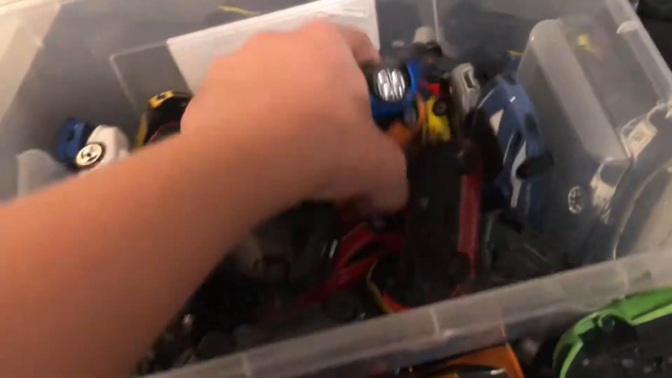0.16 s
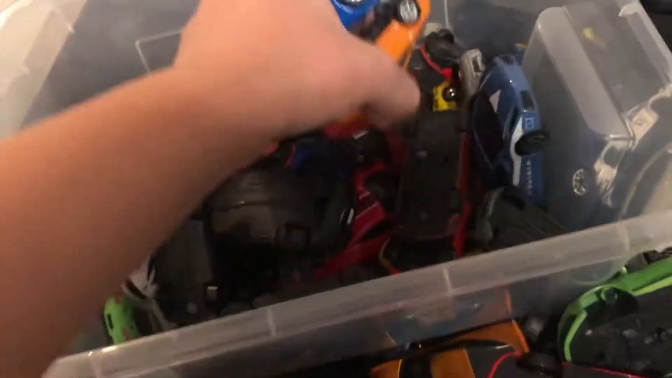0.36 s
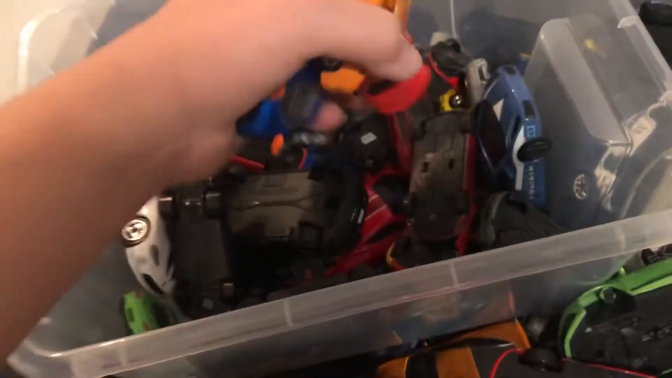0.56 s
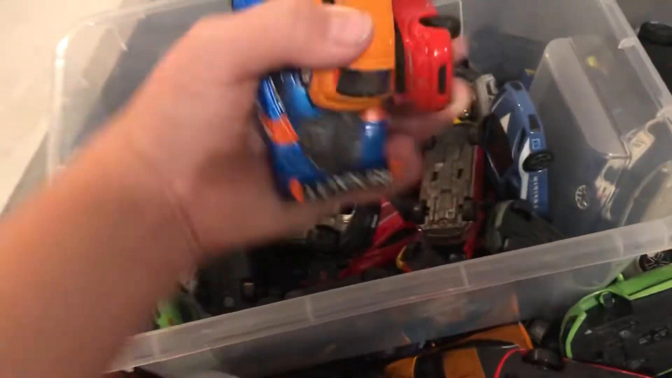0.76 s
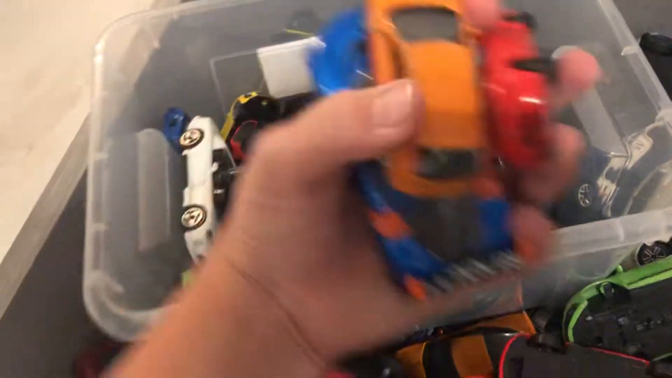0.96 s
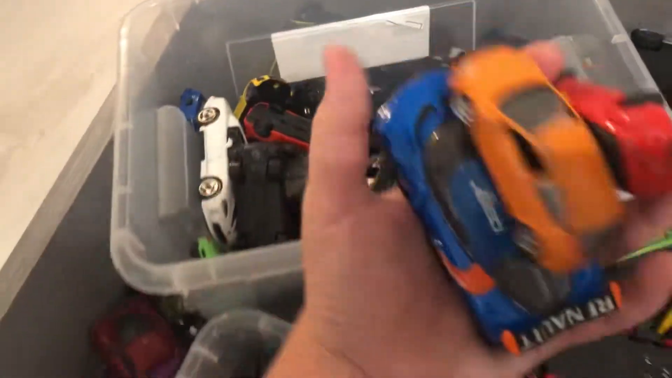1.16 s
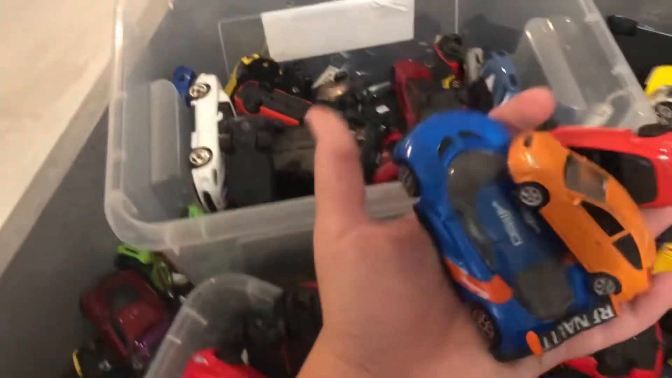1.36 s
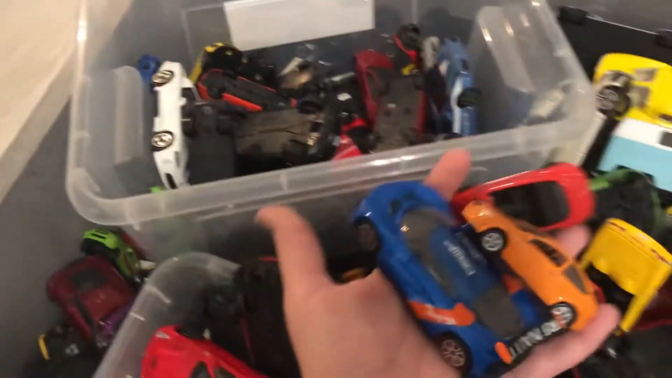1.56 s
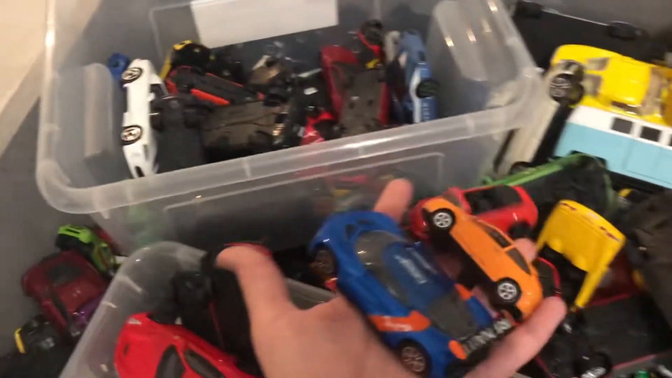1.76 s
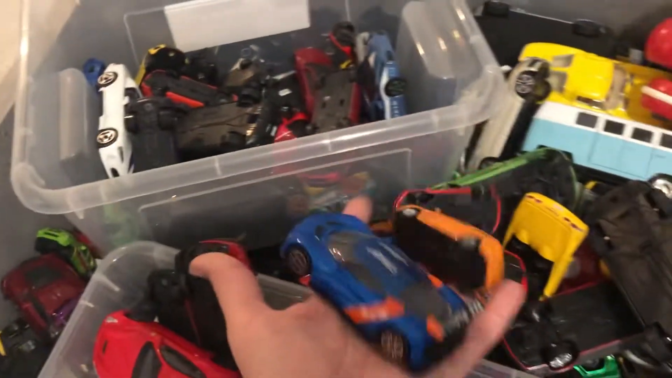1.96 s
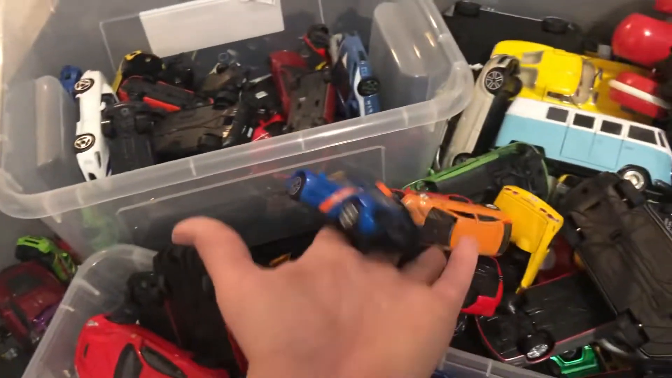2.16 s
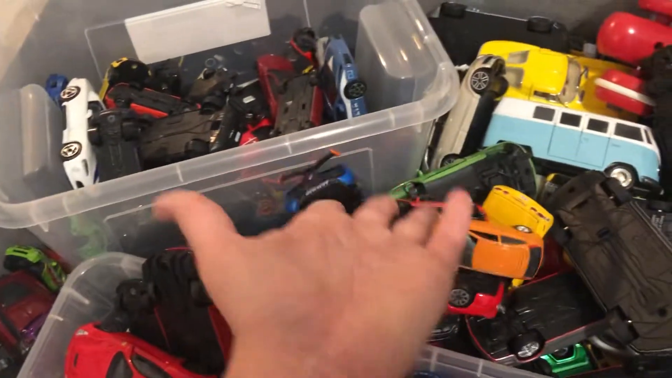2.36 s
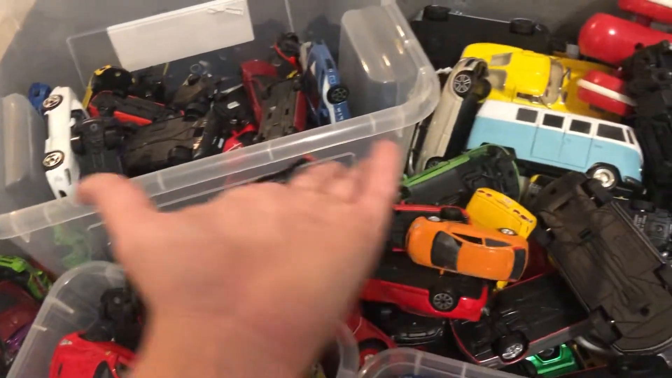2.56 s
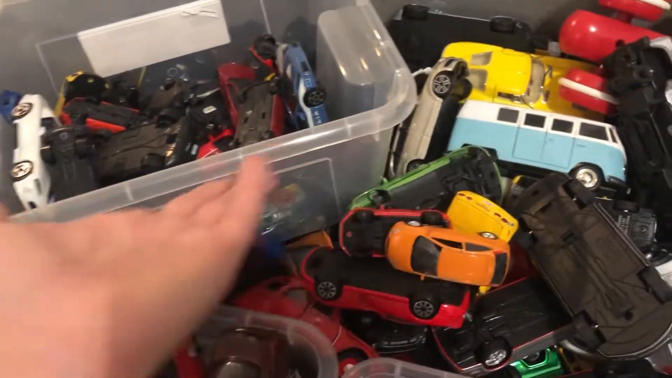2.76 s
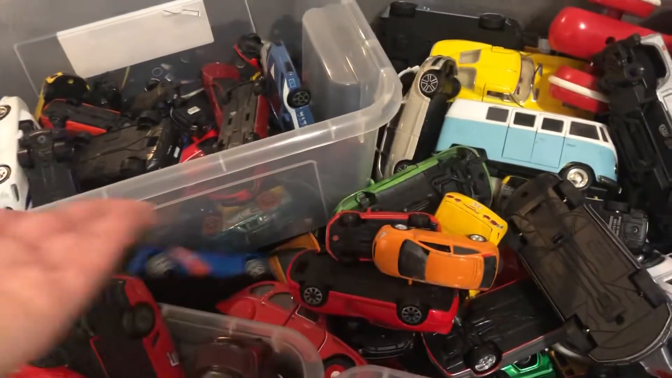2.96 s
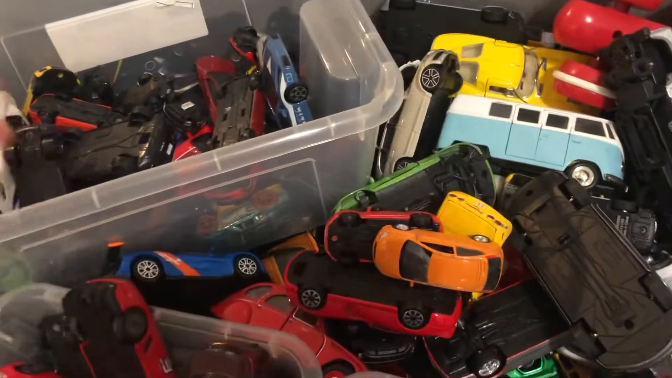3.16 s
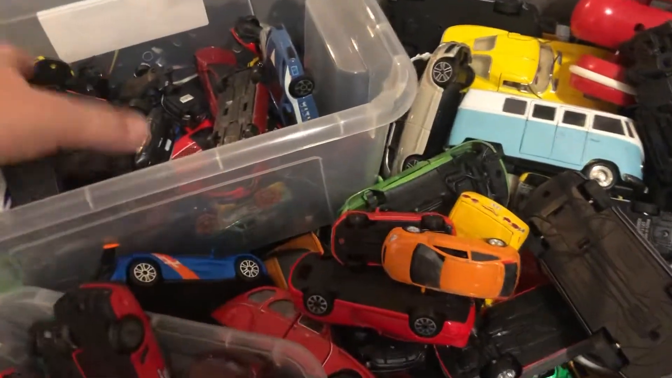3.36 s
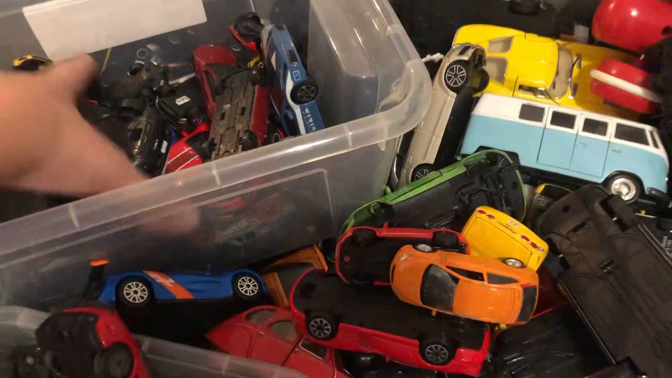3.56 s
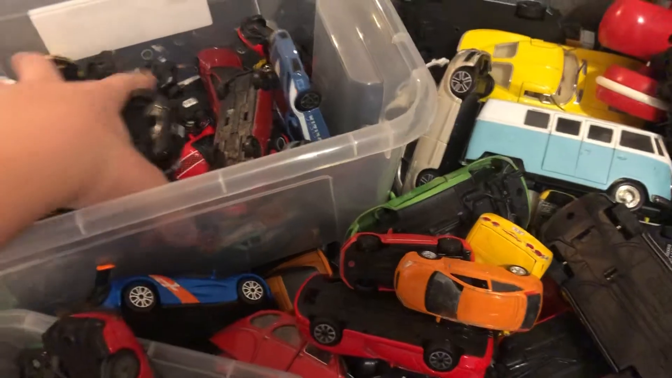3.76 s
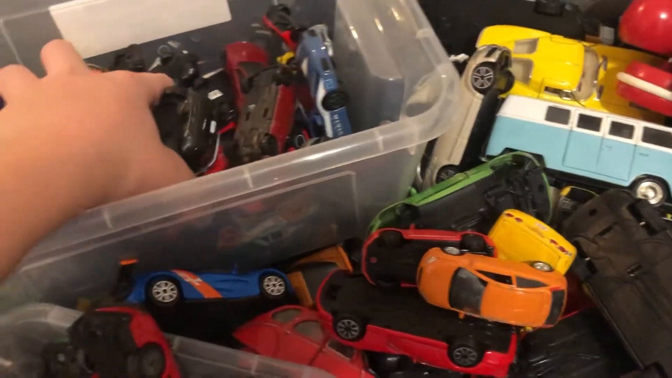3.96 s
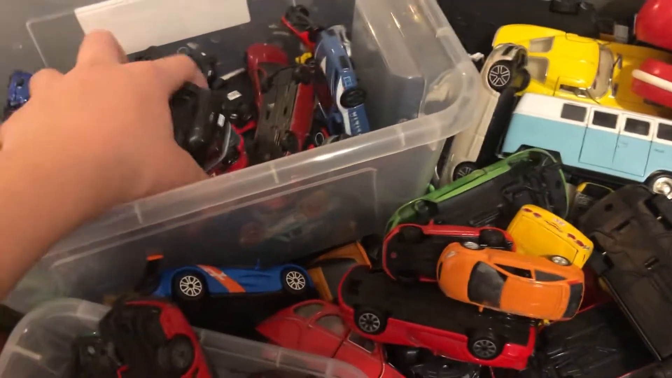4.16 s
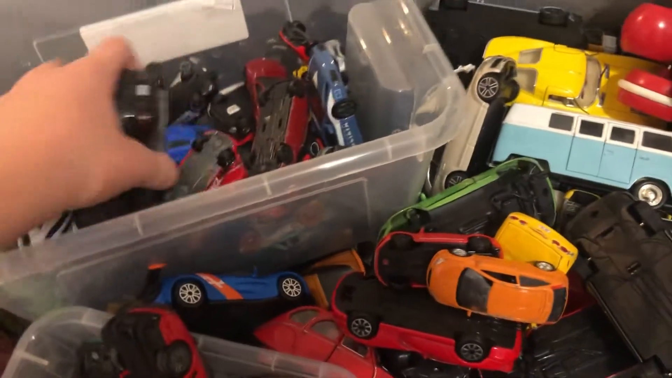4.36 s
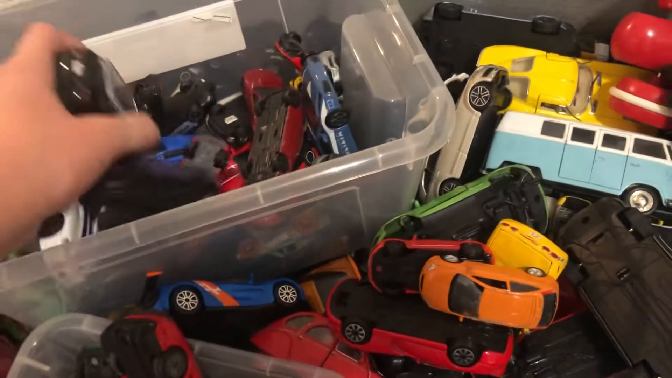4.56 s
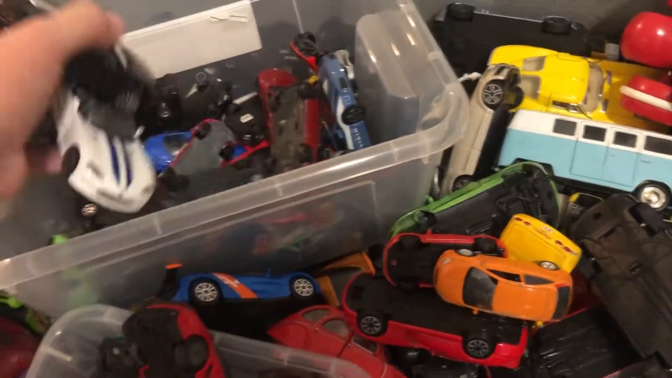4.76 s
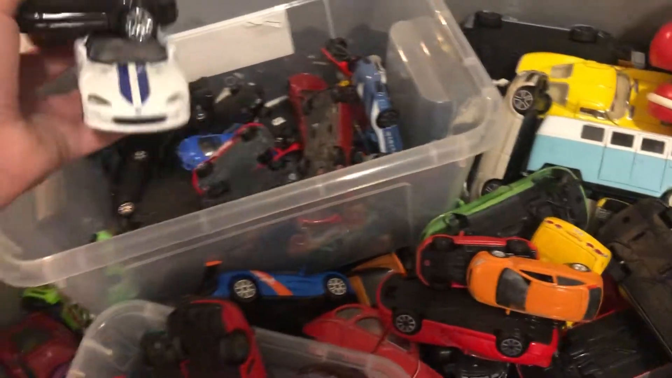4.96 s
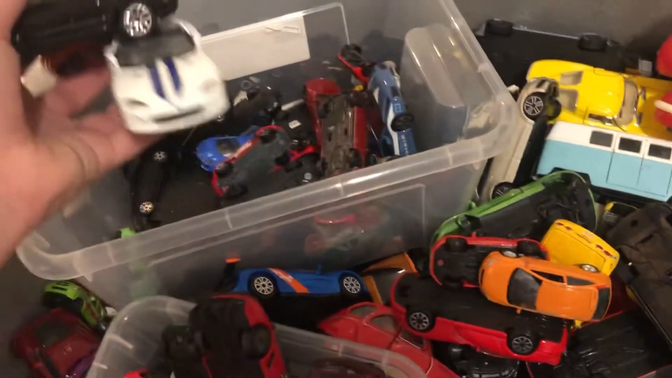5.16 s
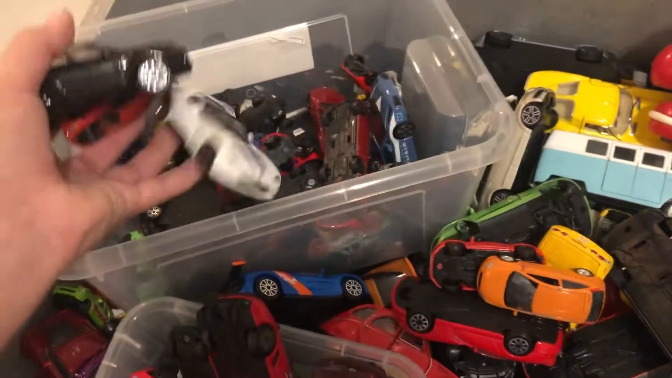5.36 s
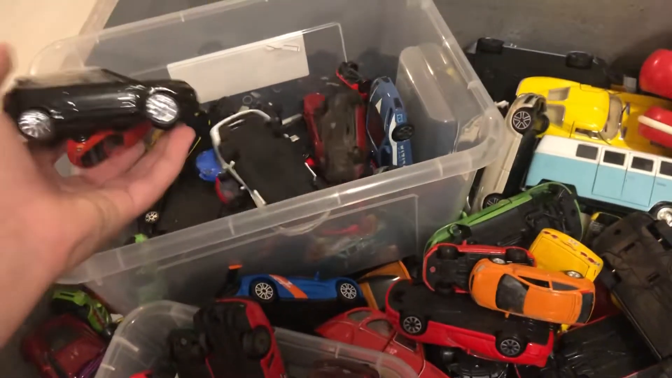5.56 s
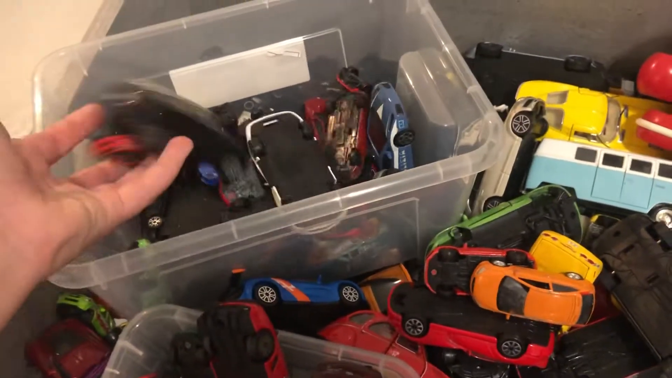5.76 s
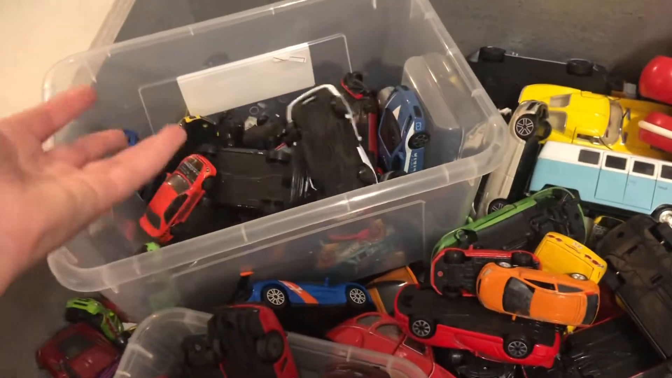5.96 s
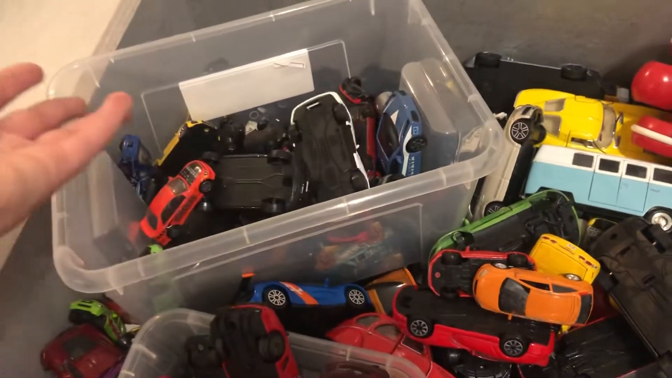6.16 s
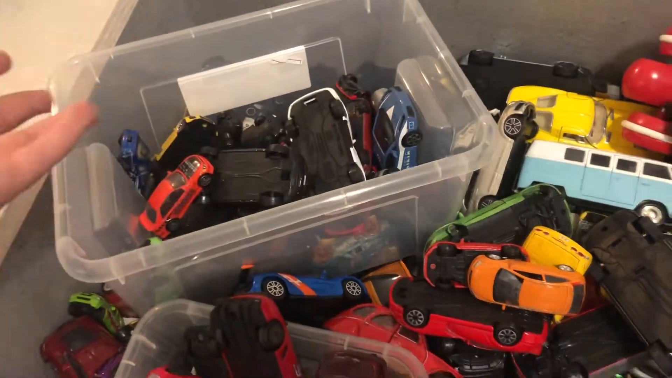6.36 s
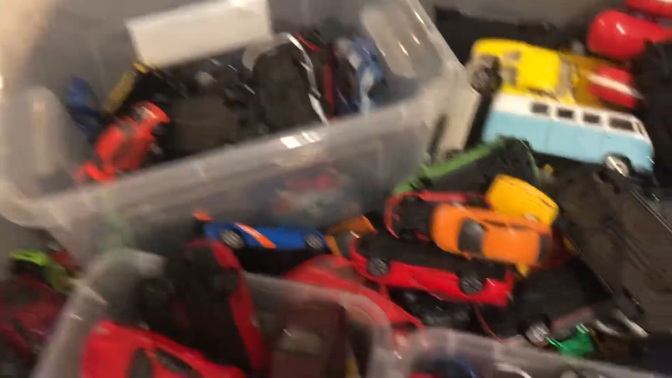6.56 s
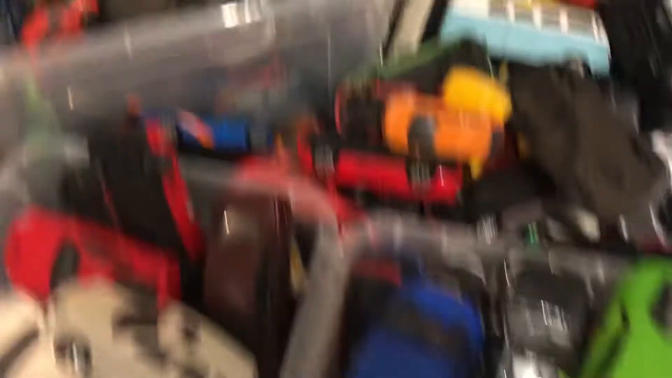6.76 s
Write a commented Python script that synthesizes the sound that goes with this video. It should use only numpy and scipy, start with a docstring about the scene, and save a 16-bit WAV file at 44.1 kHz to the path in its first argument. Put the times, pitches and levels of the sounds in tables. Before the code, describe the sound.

Hard little car bodies knock and rattle together in clumps, with wheels and axles ticking between. The hollow plastic tub booms under harder blows and heavier cars thud dully. Bursts come at the start, around two seconds, through the fourth second and near the end, separated by sparse ticks. Small microphone very near, short indoor tail, faint low hum.

```python
"""Small toy cars clack in short clumps of contacts as a hand digs through a plastic storage bin, close by.
Each clack is a burst of noise ringing a car body; a crunch of many quiet clacks rattles in between.
The hollow bin booms in damped modes under blows and sliding cars, and heavy cars thud in sagging tones.
A small room adds a short tail of sparse reflections over a faint hum made of shaped noise."""
import sys
import numpy as np
from scipy import signal
from scipy.fft import rfft, irfft
from scipy.io import wavfile
from scipy.ndimage import uniform_filter1d

SR = 44100
rng = np.random.default_rng(int(sys.argv[2]) if len(sys.argv) > 2 else 0)


def persist_wave(psi):
    """Save psi, clipped to +-1, as 16-bit WAV."""
    counts = np.round(np.clip(psi, -1, 1) * 32767).astype(np.int16)
    wavfile.write(sys.argv[1], SR, np.atleast_2d(counts).T)


N = 300762  # length of the scene in samples
CLACK_SIZE = 4096  # samples synthesized for one clack

# Car striking car: start t/s, level of the loudest moment/dB, main ring f/Hz,
# treble above 7 kHz relative to -10/dB, clump length before limiting and scaling/ms
COLLISIONS = [(0.0144, -26, 2280, -18, 26), (0.031, -16.5, 4600, 0, 19), (0.0429, -6.0, 2140, 1, 3.4),
              (0.062, -5.5, 1500, -8, 3.8), (0.0863, -19, 1100, -3, 6), (0.1079, -12, 1060, -12, 3.7),
              (0.121, -16, 2130, 3, 6.1), (0.143, -29, 2200, -8, 6), (0.186, -21.5, 5250, 8, 5.3),
              (0.2088, -13, 3800, -2.5, 4.8), (0.25, -25.5, 5400, 5, 8.9), (0.2652, -18, 3640, -3, 3),
              (0.28, -22, 1600, -8, 6), (0.297, -12.5, 2680, -4, 7.7), (0.3231, -9.5, 1630, 2, 2.14),
              (0.348, -18.5, 3900, -1, 3.6), (0.3726, -16, 2640, -11, 8.9), (0.563, -39, 3600, 3, 1.9),
              (0.626, -43, 2160, -5, 4.1), (0.657, -50.5, 1980, -21, 4.9), (0.696, -44, 1800, -14, 3.2),
              (0.707, -36, 3700, -11, 4.1), (0.724, -39.5, 1810, -21, 3.1), (0.737, -41, 2670.0, -1, 3.1),
              (0.749, -27, 3600, -7, 5), (0.819, -31, 6200, -6, 1.5), (0.847, -38, 4170.0, -17, 2.5),
              (0.872, -42, 2780, -12, 7), (0.913, -34, 4340, -15, 8), (0.963, -27, 3460, -5, 1.8),
              (0.9982, -37.5, 2440.0, -41, 6.8), (1.046, -35, 1760, -25, 3.6),
              (1.094, -39, 3460.0, -9, 4.7), (1.115, -40.5, 1660.0, -34, 4), (1.1357, -40.5, 2700, -5, 9.3),
              (1.159, -35, 2050, -52, 1.4), (1.199, -29, 3570, 0, 3.1), (1.2272, -27, 4160, 2, 10),
              (1.2467, -26, 2020, -7, 3.6), (1.262, -38, 1930, -16, 6), (1.294, -37, 3470, -7, 7.2),
              (1.3293, -23.5, 5120, -1, 5.5), (1.346, -26, 3570.0, 2, 4), (1.374, -19, 4700, 3, 1.9),
              (1.404, -30.5, 2170, -6, 4.5), (1.441, -34, 4940, -5, 4.2), (1.452, -41.5, 2520, -3, 4.1),
              (1.605, -41, 4370, -21, 5), (1.6501, -25.5, 2980, -7, 4.5), (1.6835, -16, 2940, -6, 3.7),
              (1.781, -21.5, 4530.0, -10, 3.7), (1.8338, -34, 5140, 1, 4), (1.8662, -23.5, 5760, 12, 2.9),
              (1.878, -11, 2060, -19, 3), (1.907, -11.5, 1740, -2, 6.2), (1.96, -15, 2020, -9, 1),
              (1.9991, -14.5, 6770, -6.5, 13.4), (2.04, -16, 4500, 3, 8.6), (2.05, -6, 2160, -5, 1.2),
              (2.097, -11, 3600, -2.5, 4.5), (2.129, -18.5, 3700, 0, 8), (2.185, -21, 4440, 0, 6.4),
              (2.197, -8, 4450, 3, 7.1), (2.208, -12, 4300, 2, 18), (2.219, -10, 4500, 2, 3.7),
              (2.242, -18, 3530, 1, 10), (2.2915, -19, 4720, -5, 31), (2.3472, -11, 3240, 6.5, 9.5),
              (2.465, -36.5, 7950, 1, 2.7), (2.598, -33.5, 2280, -4, 18), (2.6613, -31.5, 2110, 0, 8.6),
              (2.69, -38, 2050, -22, 11), (2.761, -20.5, 4300, 3, 13), (2.834, -18.5, 2900, 0.5, 4.7),
              (2.862, -25.5, 3830, 3, 15), (2.8904, -12, 2050, -5, 3.5), (2.934, -23, 2300, 9, 5.3),
              (2.972, -21, 3600, 4, 19), (2.9932, -21, 7040, 0.5, 16), (3.064, -27, 2110, -1, 6),
              (3.126, -36, 2040, -19, 3.3), (3.361, -38, 2530, -7, 4.9), (3.374, -36, 2800, -5, 5.6),
              (3.3862, -34, 3800, -2.5, 3.3), (3.453, -47, 5400, 0, 4), (3.477, -42, 3130, -4, 6.4),
              (3.51, -41, 3680, 11, 2.6), (3.57, -36, 2420, -11, 15), (3.6244, -25.5, 3500, 6, 3.1),
              (3.6485, -24.5, 1620, 5, 3.3), (3.6996, -30, 3500, -5, 3.7), (3.747, -19.5, 3570, -5, 3.1),
              (3.81, -8, 5630, 6.5, 4.2), (3.832, -18, 2000, -4, 5.7), (3.852, -26.5, 3100, -4, 4.4),
              (3.901, -18, 6670, 11, 3.1), (3.9124, -11.5, 3960, 0, 1), (3.9345, -21, 4080, -9, 3.1),
              (3.9507, -14.5, 3450, 2, 4.2), (4.037, -27, 1610, -5, 5.8), (4.05, -30, 2860.0, -7, 3.6),
              (4.1053, -26.5, 1100, -12, 11), (4.121, -17.5, 1570, -1, 16.6), (4.1633, -17, 5400, 3, 5),
              (4.215, -24, 3550, -2, 9.4), (4.272, -35, 3260, -4, 2.9), (4.2814, -15, 3060, -2, 3.2),
              (4.3257, -30, 2090, -18, 3), (4.3447, -23.5, 1760, -12, 4.5),
              (4.3584, -17.5, 5970, -5.5, 4.6), (4.3942, -23, 2550, -25, 3.2), (4.448, -21, 2360, 0, 20),
              (4.4857, -25, 1640, -9, 4.5), (4.501, -19, 3040, 1.5, 4.4), (4.5397, -23, 3480, -10, 3),
              (4.5583, -15.5, 5920, 10, 4.2), (4.5895, -8, 4930, -11, 1.4), (4.6025, -12, 2250, 0, 2.7),
              (4.639, -12.5, 6190, 4, 13), (4.6697, -13, 1550, -4, 6.1), (4.7166, -17.5, 3570, 3, 14),
              (4.7622, -15.5, 1590, 0, 7.6), (4.7903, -14.5, 2900, -1, 5.8),
              (4.8584, -30.5, 1550, -13, 6.6), (4.8852, -32, 1660, -23, 3.5), (4.9098, -29, 1600, -9, 3.8),
              (4.978, -45, 4500, -5, 2.6), (5.036, -42.5, 1660, -15, 17), (5.069, -41.5, 4550, -15, 3.8),
              (5.102, -40.5, 2860, -12, 13), (5.2446, -33, 1830, -30, 9.5), (5.276, -34.5, 3230, -27, 3),
              (5.3065, -36.5, 1720, -46, 4.4), (5.3295, -36.5, 3140, -31, 3.8),
              (5.3593, -15.5, 1000, -10.5, 4.2), (5.3937, -31, 2300, -15.5, 6.4),
              (5.4253, -18.5, 5940, 1, 1.9), (5.483, -11.5, 5180, 11, 3.8), (5.4998, -7, 5300, 8, 5.8),
              (5.5247, -3.5, 3760, 8, 2.2), (5.5402, -8, 4530, 10, 8.5), (5.574, -16.5, 1010, -2, 6.6),
              (5.6716, -27.5, 2740, -7, 7.9), (5.6925, -24, 1680, 3.5, 7.3), (5.744, -33, 2240.0, -1, 4.3),
              (5.769, -31.5, 2370, 8, 8.6), (5.79, -6, 6230, 13, 4.1), (5.8039, -9.5, 2500, 6.5, 5.2),
              (5.8217, -7.5, 3200, 1, 6.7), (5.843, -13, 2800, 6.5, 15), (5.8631, -10.5, 3140, 1, 14),
              (5.886, -9, 1010, -0.5, 12), (5.9022, -7, 3560, -1, 2.8), (5.923, -15.5, 1160, 2.5, 7.7),
              (6.044, -32.5, 1570, -3, 3.1)]


def gain_of(db):
    """Amplitude factor of a level in dB."""
    return 10 ** (np.asarray(db) / 20)


def evened(x):
    """Bring a whole signal to an RMS of 1."""
    return x / np.sqrt(np.mean(x ** 2) + 1e-20)


def read(points, hz):
    """Read a curve of (Hz, value) points along a logarithmic frequency axis."""
    f, value = np.transpose(points)
    return np.interp(np.log(hz + 1), np.log(f + 1), value)


def add(mix, s, sound):
    """Lay a sound into the mix at s seconds, cut off at the end of the mix."""
    part = mix[round(s * SR):][:len(sound)]
    part += sound[:len(part)]


def mode(f, hz, t60):
    """Frequency response of one damped mode, 1 at its centre."""
    half_width = np.log(1000) / (2 * np.pi * t60)
    return 2j * half_width * f / (hz ** 2 - f ** 2 + 2j * half_width * f)


def clacks():
    """The distinct collisions; the current move of the hand sets how hollow or thin they knock."""
    s, db, hz, top_db, ms = np.transpose(COLLISIONS)
    _, _, knock_db = stirring()
    knock_db = knock_db[(s * SR).astype(int) + 200]
    out = np.zeros(N)
    for at, level_db, sound in zip(s, db, clack(hz, top_db, knock_db, ms)):
        add(out, at, gain_of(level_db) * sound)
    return out


def clack(hz, top_db, knock_db, ms):
    """One row per clack, loudest moment 1: a clump of tiny contacts rings the struck car body."""
    # Colour of a clack: f/Hz, level per Hz/dB
    car_colour = [(290, -43), (500, -16.5), (1080, -8), (1820, -5), (2070, -5.5), (2690, -4), (4400, -5),
                  (5020, -5.5), (12300, -14.5), (16000, -31)]
    ring_t60 = 0.011  # s
    t, f = np.arange(CLACK_SIZE) / SR, np.fft.rfftfreq(CLACK_SIZE, 1 / SR)
    draws = rng.standard_normal((len(hz), 2 * CLACK_SIZE + 24))
    noise, lumps, place, size = np.split(draws, [CLACK_SIZE, 2 * CLACK_SIZE, 2 * CLACK_SIZE + 12], axis=1)

    # the clump swells, then thins out, with a weaker tail behind it
    u = t / (0.44 * np.clip(ms, 0.5, 30)[:, None] / 1000)
    envelope = u * np.exp(1 - u) + 0.18 * np.minimum(u, 1) * np.exp(-t / 0.018)
    # edges, axles and wheels touch one after another
    uneven = gain_of(1.8 * evened(uniform_filter1d(lumps, 30, 1)))
    force = noise * uneven * envelope

    top = (top_db[:, None] + 10) / (1 + (7000 / (f + 1)) ** 4)  # treble shelf
    knock = (knock_db[:, None] + 20.5) / (1 + (f / 1600) ** 6)  # shelf for the hollow low end
    rings = 4.2 * mode(f, hz[:, None], ring_t60)
    for k in range(12):  # every car lies differently, so the lesser modes fall by chance
        lesser_hz = 4500 * np.exp(0.55 * place[:, [k]])
        rings = rings + gain_of(1.05 + 2 * size[:, [k]]) * mode(f, lesser_hz, ring_t60)

    spectrum = rfft(force) * gain_of(read(car_colour, f) + top + knock) * (1 + rings)
    sound = irfft(spectrum)[:, :CLACK_SIZE - 500]
    loudest = uniform_filter1d(sound ** 2, 80, 1).max(1, keepdims=True)
    return sound / np.sqrt(2 * loudest)


def rattle():
    """A crunch of small contacts of wheels, axles and rubbing bodies, following the stirring."""
    count, contacts_per_s = 24, 280
    hz = np.geomspace(1700, 6500, count)
    sounds = clack(hz, np.full(count, -7.), np.full(count, -28.), np.full(count, 2.5))[:, :1500]
    size = gain_of(5 * np.minimum(rng.exponential(1, N), 3))
    size = size * (rng.random(N) < contacts_per_s / SR)
    which = rng.integers(0, count, N)
    out = sum(signal.oaconvolve(size * (which == k), sounds[k])[:N] for k in range(count))
    rattle_db, _, _ = stirring()
    return evened(out) * gain_of(rattle_db)


def stirring():
    """Rattle, rumble and knock in dB at every sample: the moves of the hand, plus a shake after each clack."""
    # Moves of the hand that keep the cars shifting: start t/s, length/s, rattle level at the start/dB,
    # rattle level at the end/dB, rumble above the rattle/dB, hollow knock of the clacks (neutral at -20.5)/dB
    hand_moves = [(0.002, 0.35, -29.5, -48.5, 0, -14), (0.695, 0.53, -80, -68, -8.5, -22.5),
                  (1.202, 0.22, -34, -53, -20.5, -20.5), (1.592, 0.16, -41, -60.5, -14, -31),
                  (1.89, 0.5, -45, -39, -5, -24), (2.437, 0.3, -59.5, -51.5, -4, -20.5),
                  (2.761, 0.29, -53, -44, -1, -14), (3.355, 0.39, -62, -54, 11, -4.5),
                  (3.621, 0.25, -38, -31.5, 0.5, -10.5), (4.034, 0.022, -40, -44.5, 2.5, -16),
                  (4.104, 0.64, -40, -39, 0.5, -20.5), (4.855, 0.28, -49, -67.5, 7, -9),
                  (5.197, 0.1, -57, -71.5, -11.5, -17.5), (5.375, 0.056, -43.5, -57.5, -2, -12.5),
                  (5.49, 0.075, -26.5, -24, -1, -9), (5.806, 0.084, -36.5, -21.5, 2, -11.5),
                  (6.024, 0.027, -69.5, -51.5, 15, -7.5)]
    start_db_per_s, settle_db_per_s = 1504.5, 169.5  # how fast the stirring sets in and dies away
    shake_db, shake_db_per_s = -25.5, 305  # neighbouring cars: level relative to the clack, then decay
    t = np.arange(0, N + 64, 64) / SR  # one level every 64 samples

    start, length, first_db, last_db, hollow_db, knock_db = np.transpose(hand_moves)[:, :, None]
    move_db = first_db + (last_db - first_db) * np.clip((t - start) / length, 0, 1)
    move_db = move_db - start_db_per_s * np.maximum(start - t, 0)
    move_db = move_db - settle_db_per_s * np.maximum(t - start - length, 0)
    moves = gain_of(2 * np.maximum(move_db, -200))  # as power

    s, db = np.transpose(COLLISIONS)[:2, :, None]
    shakes = gain_of(2 * (db + shake_db - shake_db_per_s * abs(t - s))) * (t > s)

    rattle_db = 10 * np.log10(moves.sum(0) + shakes.sum(0))
    share = moves / moves.sum(0)  # the stronger a move, the more it sets the colour
    levels = rattle_db, rattle_db + (share * hollow_db).sum(0), (share * knock_db).sum(0)
    return [np.interp(np.arange(N) / SR, t, level_db) for level_db in levels]


def thumps():
    """Each blow rings the bin and one panel tone; the push is soft, so the sound swells for a few ms."""
    # Blows that reach the bin walls and floor: start t/s, peak level/dB, panel boom f/Hz
    blows = [(0.033, -11.5, 536), (0.062, -14.5, 360), (0.083, -15.5, 430), (0.143, -17.5, 353),
             (0.206, -18, 420), (0.281, -24.5, 446), (0.306, -28, 510), (0.324, -25.5, 570.0),
             (0.38, -27, 335), (1.888, -31.5, 397), (1.914, -25, 391), (2.102, -27.5, 240.0),
             (2.185, -15, 300), (2.313, -20.5, 580), (2.358, -20, 310), (2.833, -26, 298),
             (2.896, -23.5, 300), (2.985, -28.5, 264), (3.356, -30.5, 348), (3.65, -20, 415),
             (3.676, -23.5, 420), (3.764, -27, 636), (3.81, -26, 535), (3.91, -21, 543), (4.119, -8, 570),
             (4.134, -11, 494), (4.179, -24, 510.0), (4.214, -24, 420), (4.269, -24, 545),
             (4.285, -22, 570.0), (4.361, -26, 530), (4.433, -28.5, 420), (4.499, -16.5, 380),
             (4.594, -17.5, 362), (4.674, -16.5, 408), (4.715, -21.5, 510.0), (4.743, -13, 474),
             (4.765, -8, 403), (4.792, -10.5, 393), (4.858, -21.5, 416), (4.912, -24, 490),
             (5.07, -31, 460), (5.3587, -19.5, 636), (5.486, -6.5, 357), (5.503, -9, 450), (5.543, -6, 436),
             (5.552, -12, 503), (5.57, -15, 360), (5.801, -7.5, 399), (5.867, -8, 349), (5.887, -5.5, 577),
             (6.028, -30, 420.0), (6.047, -24, 423), (6.066, -27.5, 890), (6.452, -54, 643)]
    t, out = np.arange(8000) / SR, np.zeros(N)
    for s, db, hz in blows:
        panel = 4.5 * gain_of(-60 * t / 0.038) * np.sin(2 * np.pi * hz * t)
        sound = np.convolve(bin_ring(t) + panel, np.hanning(12))[:len(t)]
        sound = sound * (1 - np.exp(-t / 0.0054))
        add(out, s, gain_of(db) * sound / abs(sound).max())
    return out


def bin_ring(t):
    """All modes of the bin; where the blow lands and how the cars load the walls shifts level and pitch by chance."""
    # Modes of the bin before the chance shifts: f/Hz, level/dB, t60/s
    bin_modes = [(240, -30.5, 0.022), (353, -7.5, 0.054), (374.6, -3.5, 0.093), (420, -1.5, 0.067),
                 (510, 1.5, 0.047), (570, 2.5, 0.053), (740, 2, 0.04), (972, 4.5, 0.026), (1220, -3, 0.02),
                 (1458, 3, 0.019)]
    share, shift = rng.standard_normal((2, len(bin_modes)))
    ring = 0
    for (hz, db, t60), a, b in zip(bin_modes, share, shift):
        decay = gain_of(db - 60 * t / t60 + 4.9 * a)
        ring = ring + decay * np.sin(2 * np.pi * hz * (1 + 0.08 * b) * t)
    return ring


def rumble():
    """Cars sliding over the bin floor push it with dense, uneven small blows."""
    t, blows_per_s = np.arange(6000) / SR, 260
    pushes = gain_of(4 * np.minimum(rng.exponential(1, N), 3))
    pushes = pushes * (rng.random(N) < blows_per_s / SR)
    pushes *= np.sign(rng.standard_normal(N))  # inward or outward
    which = rng.integers(0, 10, N)  # ten variants of the ring
    out = sum(signal.oaconvolve(pushes * (which == k), bin_ring(t))[:N] for k in range(10))
    # thin walls radiate little bass
    out = signal.sosfilt(signal.butter(2, 125, "high", fs=SR, output="sos"), out)
    _, rumble_db, _ = stirring()
    return evened(out) * gain_of(rumble_db)


def thuds():
    """A dull push whose pitch sags as the pile settles, blurred by the low shudder of the pile."""
    # Heavy cars landing on the pile shake the floor under it: start t/s, level/dB
    landings = [(1.91, -35), (2.183, -28), (2.35, -24.5), (2.888, -40), (4.507, -28), (5.364, -24.5),
                (5.899, -33.5), (6.452, -53.5)]
    t, out = np.arange(6000) / SR, np.zeros(N)
    hz = 90 + 600 * np.exp(-t / 0.0058)
    push = np.sin(2 * np.pi * np.cumsum(hz) / SR) * gain_of(-60 * t / 0.09)
    low = signal.butter(2, 220, fs=SR, output="sos")
    for s, db in landings:
        noise = evened(signal.sosfilt(low, rng.standard_normal(len(t))))
        shudder = 0.3 * noise * gain_of(-60 * t / 0.14)
        add(out, s, gain_of(db) * (push + shudder) * (1 - np.exp(-t / 0.0026)))
    return out


def room(x):
    """Sparse reflections of random sign, each band dying at its own speed.

    Three reflection patterns are blended in turn at a steady 23 Hz, so the tail has no fixed colour."""
    # Decay of the room: f/Hz, t60/s
    room_decay = [(200, 0.33), (1400, 0.34), (4000, 0.27), (10000, 0.26), (16000, 0.017)]
    blend_hz = 23
    at, out = np.arange(200, SR // 2 - 20, 20), np.zeros(N)
    for k in range(3):
        taps = np.zeros(SR // 2)
        taps[at + rng.integers(0, 20, len(at))] = rng.choice([-1., 1.], len(at))
        hz, t, z = signal.stft(taps, SR, nperseg=256)
        decay = gain_of(-60 * t / read(room_decay, hz)[:, None])
        tail = signal.istft(z * decay, SR, nperseg=256)[1]
        share = np.sqrt(2 / 3) * np.cos(2 * np.pi * (blend_hz * np.arange(N) / SR + k / 3))
        out += signal.fftconvolve(x * share, tail / np.linalg.norm(tail))[:N]
    return out


def hum():
    """Steady room and microphone noise: white noise shaped by a spectrum curve."""
    # Colour of the noise: f/Hz, level per Hz/dB
    hum_colour = [(24, -36.5), (40, 9.5), (90, -1), (125, -9.5), (155, -7), (189, -20), (226, -6),
                  (256, -17.5), (8990, -32), (16000, -44.5)]
    f = np.fft.rfftfreq(N, 1 / SR)
    noise = irfft(rfft(rng.standard_normal(N)) * gain_of(read(hum_colour, f)), N)
    return gain_of(-63) * evened(noise)


def scene():
    """Cars and bin sound directly and through the room, over the hum."""
    cars = clacks() + rattle()
    box = thumps() + rumble() + thuds()
    tail = room(gain_of(-12.5) * cars + gain_of(-12.5) * box)
    return (cars + box + tail + hum())[None]


def record(dry):
    """The small microphone drops the deep bass, its preamplifier rounds the highest peaks, then the band limit."""
    edge_hz = 16200
    thin = signal.sosfilt(signal.butter(3, 75, "high", fs=SR, output="sos"), dry)
    rounded = 1.2 * np.tanh(thin / 1.2)
    band_limit = signal.firwin(511, edge_hz, window=("kaiser", 9), fs=SR)[None]
    return signal.oaconvolve(rounded, band_limit, "same")


dry = scene()
out = record(dry)
persist_wave(out)
```